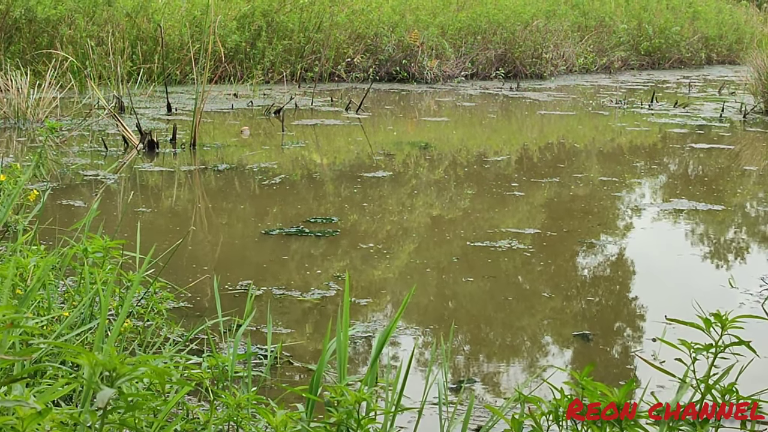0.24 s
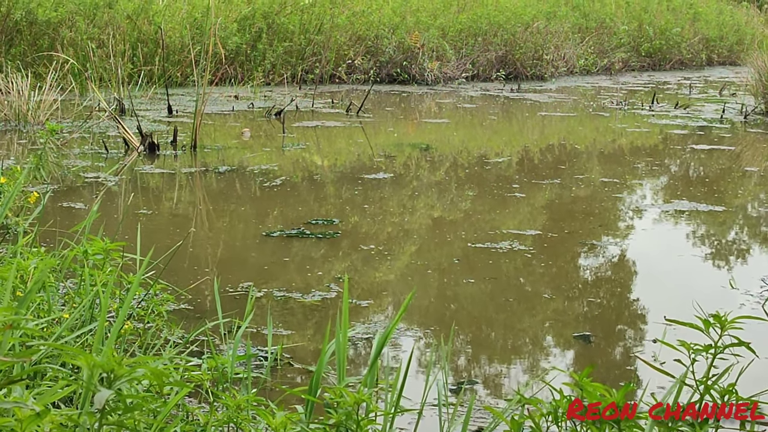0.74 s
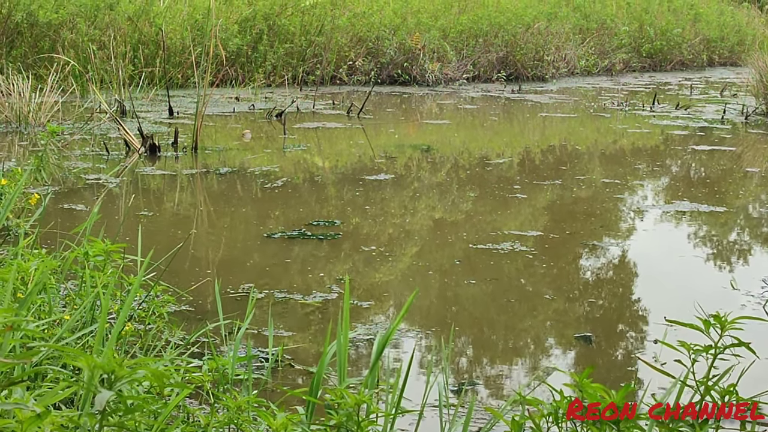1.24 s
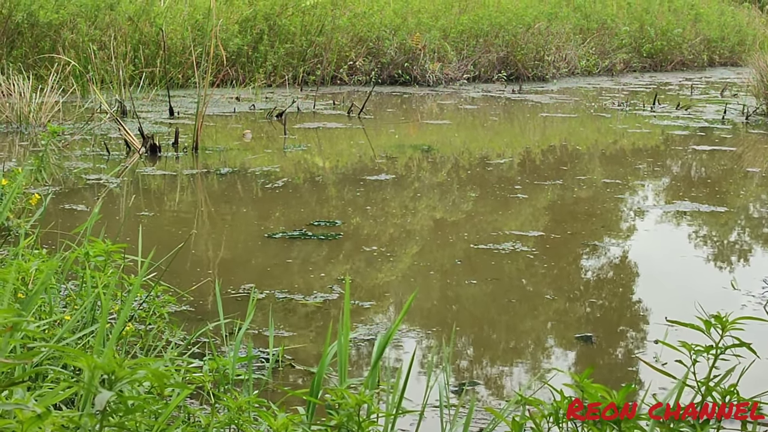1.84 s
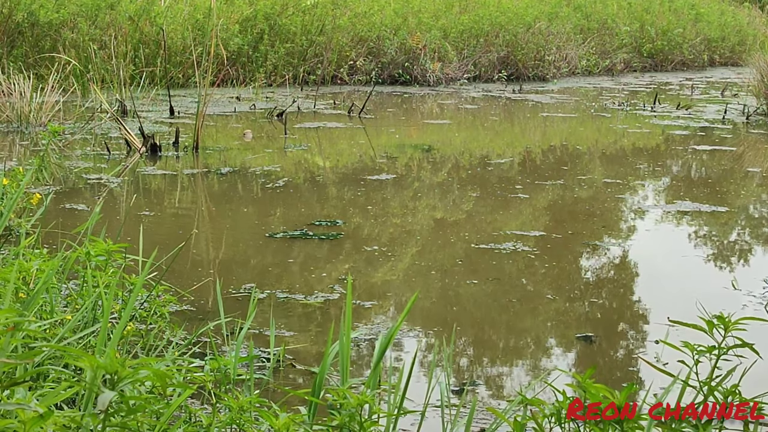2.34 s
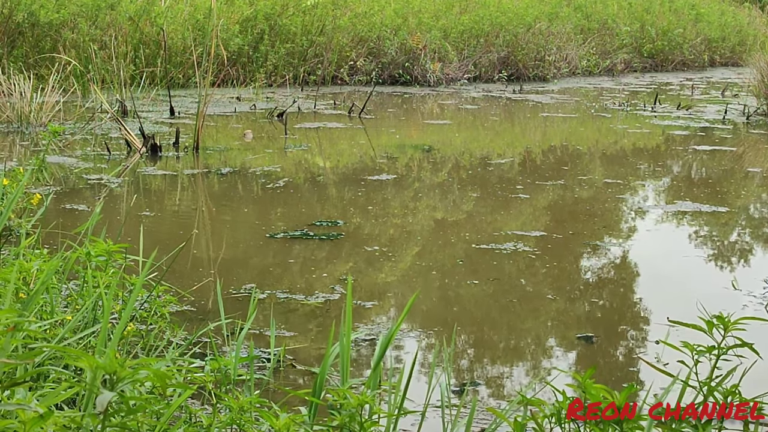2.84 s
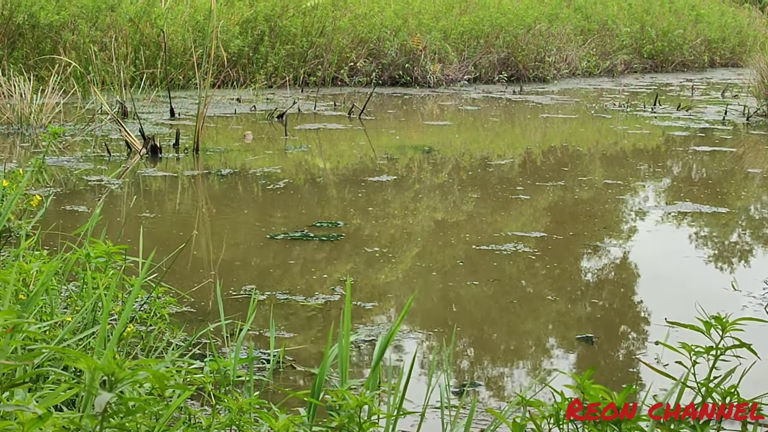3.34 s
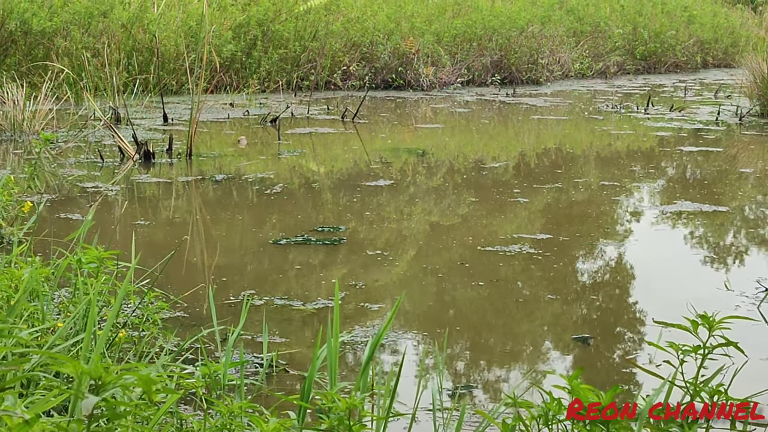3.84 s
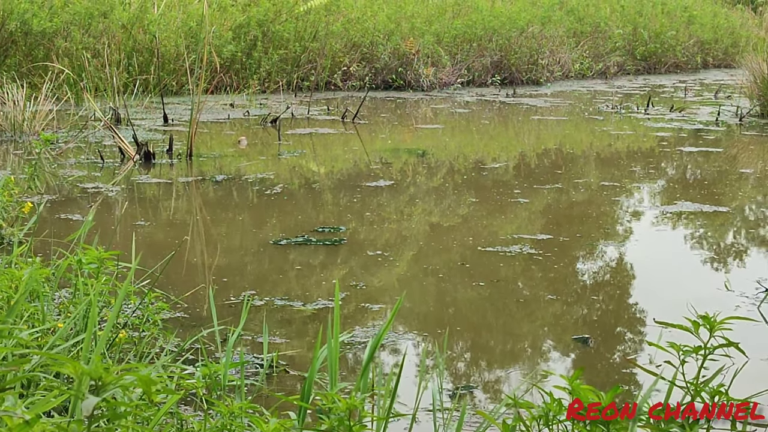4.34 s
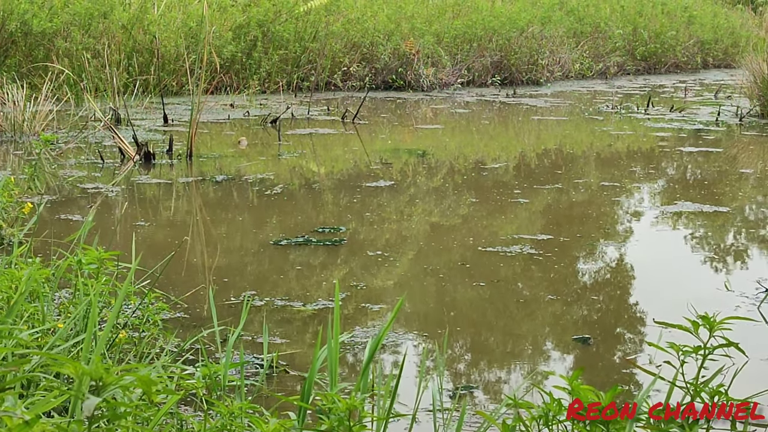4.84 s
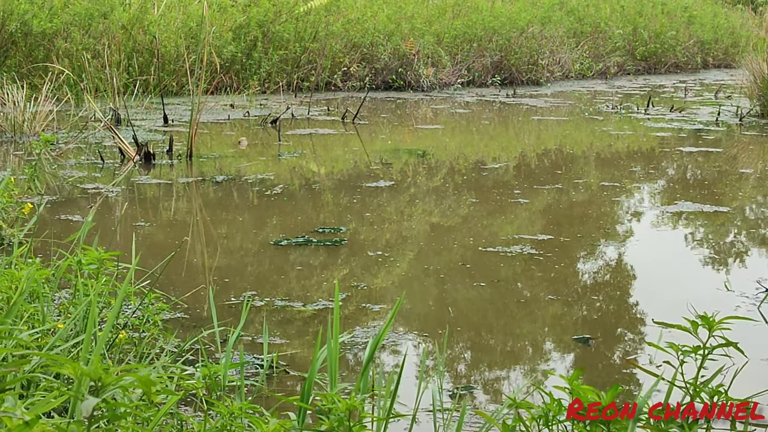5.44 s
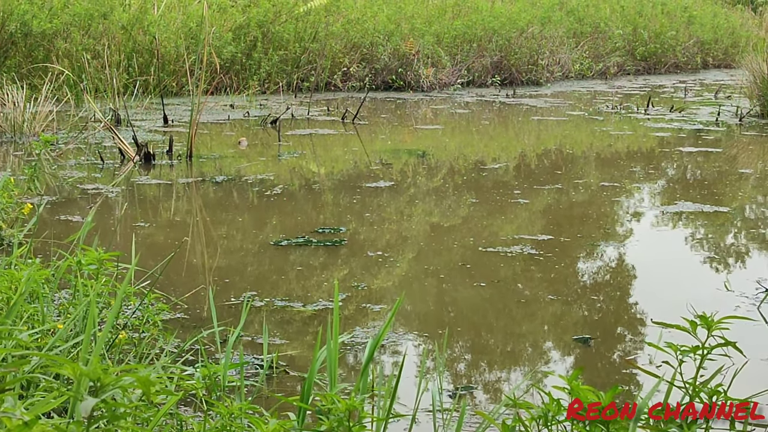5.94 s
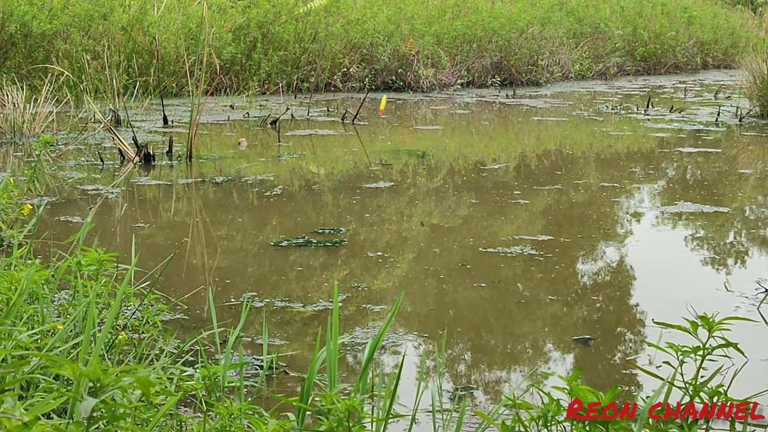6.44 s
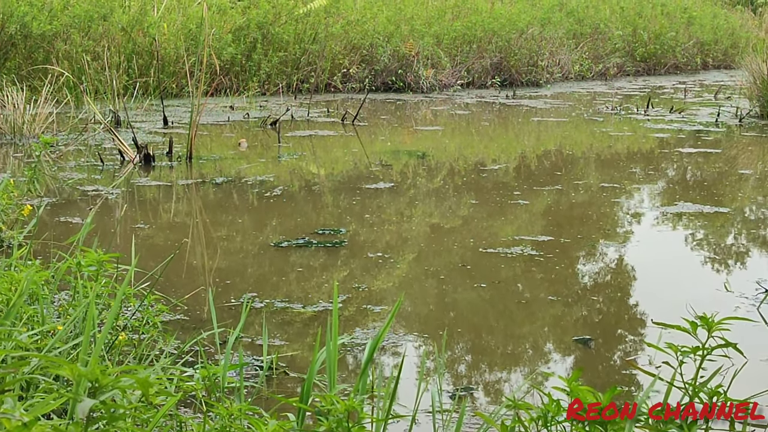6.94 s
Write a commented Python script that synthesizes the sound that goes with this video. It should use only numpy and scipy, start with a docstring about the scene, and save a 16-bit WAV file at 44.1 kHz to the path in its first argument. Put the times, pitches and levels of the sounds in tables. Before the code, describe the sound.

A quiet chorus of high insects chirrs throughout around a pond, over a faint distant rumble. A fast trill runs through the first half, with a few faint, far whistles. A twig snaps sharply close by at about 1.1 seconds, smaller cracks and a grass swish follow around 1.6, and more rustling and ticks come near 3. At 3.6 the sound cuts out for an instant, then returns with a pop, a low thump and a few clicks as the volume climbs back. From about 4 seconds a cricket gives thin, very high chirps, about eight a second. A small bird sings a short sliding phrase five times between 4.4 and 6.9, lightly echoing, with faint hoarse calls behind. A nearby cicada rasps in three rising swells at about 4.2, 4.9 and 5.5, then tightens into a clear, fluttering whine that holds until the end, just past 7.

```python
"""A chorus of insects chirrs and trills around a swampy pond, over distant rumble, faint whistles,
rustling grass and snapping twigs. Midway the sound cuts out and restarts: the signal swings off zero
in steps while the volume creeps back. Then a cricket strokes its wings, a small bird repeats a phrase,
and a near cicada clicks its tymbals (drum-like skins on its body), rasping at first and then
tightening into a clear whine."""
import sys
import numpy as np
from scipy import signal
from scipy.io import wavfile
from scipy.ndimage import uniform_filter1d

SR = 44100
rng = np.random.default_rng(int(sys.argv[2]) if len(sys.argv) > 2 else 0)


def put_to_file(sound):
    """Save the sound as 16-bit audio at rate SR, in the file named by the first command-line argument."""
    columns = np.atleast_2d(sound).T  # one column per channel
    safe = np.clip(columns, -1, 1)
    whole_steps = np.round(safe * 32767)
    wavfile.write(sys.argv[1], SR, whole_steps.astype(np.int16))


N = 316638
T = np.arange(N) / SR
CUT_S, RESTART_S = 3.567, 3.5944  # the sound drops out between these times
TREBLE_LIMIT_HZ = 14280


def gain_of(db):
    """Turns decibels into a number to multiply by."""
    return 10 ** (np.asarray(db) / 20)


def unit_level(x):
    """Scales a signal to an average (rms) size of 1."""
    return x / np.sqrt(np.mean(x ** 2) + 1e-20)


def sine(hz):
    """A pure tone that follows a pitch curve."""
    return np.sin(2 * np.pi * np.cumsum(hz) / SR)


def curve_at(points, hz):
    """Looks up values between a table's frequencies, on a log scale."""
    f, value = np.transpose(points)
    return np.interp(np.log(hz + 1), np.log(f + 1), value)


def add(mix, s, sound):
    """Mixes a sound in at s seconds."""
    part = mix[round(s * SR):][:len(sound)]
    part += sound[:len(part)]


def wander(hz):
    """A random drift that changes up to about hz times a second."""
    return unit_level(signal.sosfilt(signal.butter(2, hz, fs=SR, output="sos"), rng.standard_normal(N)))


def resonate(x, hz, width_hz):
    """Rings at a moving pitch: shifts that pitch down to zero, smooths twice, and shifts back."""
    turn = np.exp(2j * np.pi * np.cumsum(hz) / SR)
    decay = np.exp(-np.pi * width_hz / SR)
    return (turn * signal.lfilter([(1 - decay) ** 2], [1, -2 * decay, decay ** 2], x / turn)).real


def place(x, pan_db, lag):
    """Puts a sound to one side: the left ear gets it pan_db louder and lag samples later."""
    return np.array([np.roll(x, lag) * gain_of(pan_db / 2), x * gain_of(-pan_db / 2)])


def echoes(x, fade_s, level_db):
    """A blur of echoes from the reeds and the far bank, different at each ear."""
    t = np.arange(SR // 3) / SR
    tail = rng.standard_normal((2, len(t))) * gain_of(-60 * t / fade_s) * (t > .005)
    return gain_of(level_db) * signal.oaconvolve(x[None], tail / np.linalg.norm(tail[0]), axes=1)[:, :N]


def clicks(per_s, spread_db):
    """Two unrelated streams of dense clicks of uneven size."""
    size = gain_of(spread_db * np.minimum(rng.exponential(1, (2, N)), 4))
    return size * rng.standard_normal((2, N)) * (rng.random((2, N)) < per_s / SR)


# Tone of the open air before and after the restart: f/Hz, relative level/dB
AIR_BEFORE = [(20, -8.5), (50, 1.5), (75, -8), (110, -8.5), (180, -13.5), (300, -19), (1000, -25),
              (2500, -27.5), (5500, -65), (9000, -26.5), (10800, -33), (14500, -25)]
AIR_AFTER = [(20, -18), (55, 0.5), (80, -21.5), (110, -6), (180, -16), (300, -20.5), (1000, -28.5),
             (2500, -31), (5500, -45), (9000, -31), (10800, -35), (14500, -25.5)]
# How alike the air sounds at the two ears: f/Hz, likeness (1 same, 0 unrelated, -1 opposite)
AIR_LIKENESS = [(60, 0.78), (180, 0.75), (540, 0.36), (1610, -0.24), (4830, 1), (14500, -0.92)]


def air(spectrum, level_db):
    """Open air and distant rumble: noise with drifting louder and softer patches."""
    frames, hz = N // 256 + 5, np.fft.rfftfreq(1024, 1 / SR)
    noise = rng.standard_normal((frames, 513, 5)).T
    left, other = noise[0] + 1j * noise[1], noise[2] + 1j * noise[3]
    patches = unit_level(uniform_filter1d(uniform_filter1d(noise[4], size=10, axis=0), size=8, axis=1))
    alike = curve_at(AIR_LIKENESS, hz)[:, None]
    ears = np.array([left, alike * left + np.sqrt(1 - alike ** 2) * other])
    ears *= gain_of(curve_at(spectrum, hz)[:, None] + 2.06 * patches) * (hz > 0)[:, None]
    return gain_of(level_db) * unit_level(signal.istft(ears, nperseg=1024, noverlap=768)[1][:, :N])


def engine():
    """A deep engine note far away, nearly steady."""
    tone = sine(37.5 * (1 + .051 * wander(9.1)))
    return gain_of(-55 + 2.3 * wander(28)) * tone


# Far insects and low hums: f/Hz, width/Hz, level before/dB, level after the restart/dB,
# throb rate/Hz, throb depth (0-1), left over right/dB, likeness at the two ears (0-1)
CHORUS = [(50.75, 5.1, -76, -66, 15, 0.12, 14.5, 1), (160.6, 28, -76.5, -72.5, 3.6, 0.23, 1, 1),
          (267.5, 23, -80.5, -87.5, 23, 0.25, 3.5, 0.78), (530.7, 97, -76.5, -84, 6.5, 0.25, 1, 0.77),
          (3130, 300, -68.5, -72.5, 55, 0.23, 2.5, 0.17), (4536, 220, -80, -85, 56, 0.19, 2, 0.2),
          (4742, 220, -75, -88, 55, 0.2, -2.5, 0.36), (6614, 460, -69, -68.5, 110, 0, 0.5, 0.05),
          (7115, 664, -64.5, -63.5, 54, 0.1, -3.5, 0.067), (8960, 960, -79, -80.5, 90, 0, 11, 0.95),
          (12160, 720, -76, -90.5, 32, 0.1, -3.5, 0.3), (13280, 1500, -72, -72, 41, 0.1, 6.5, 0.37)]


def chorus():
    """Many tiny clicks ring one body pitch per kind of insect; each band throbs at its own uneven rate."""
    out, drive = np.zeros((2, N)), clicks(per_s=4000, spread_db=2.14)
    for hz, width, before_db, after_db, throb_hz, depth, pan_db, alike in CHORUS:
        body = signal.tf2sos(*signal.iirpeak(hz, hz / width, SR))
        own_clicks = np.roll(drive, rng.integers(N), axis=1)
        left, other = signal.sosfilt(np.tile(body, (2, 1)), own_clicks)
        ears = np.array([left, alike * np.roll(left, 14) + np.sqrt(1 - alike ** 2) * other])
        throb = 1 + depth * sine(throb_hz * (1 + .2 * wander(8)))
        level_db = np.where(T < RESTART_S, before_db, after_db) + 1.26 * wander(7.8)
        out += unit_level(ears * throb) * gain_of(level_db + pan_db / 2 * np.array([[1], [-1]]))
    return out


# Faint far whistles: t/s, length/s, starting f/Hz, ending f/Hz, level/dB
WHISTLES = [(0, .25, 1260, 1300, -82), (1.68, .1, 1700, 2700, -78), (1.79, .1, 2550, 1950, -78),
            (2.01, .11, 1800, 2800, -77), (2.37, .1, 1950, 2800, -79), (2.76, .1, 1950, 2800, -78)]
# Faint hoarse notes, all rising alike: t/s, length/s, level/dB
CROAKS = [(3.812, .18, -75), (4.215, .27, -75), (4.73, .13, -73), (5.199, .1, -73.5), (5.33, .17, -73),
          (5.72, .23, -76), (6.228, .2, -76), (6.67, .22, -76)]


def far_calls():
    """Sliding calls: a whistle blends a pure tone with ringing noise, a croak is all noise."""
    croak_from_hz, croak_to_hz = 3670, 4630
    calls = [(*row, .4) for row in WHISTLES]  # the added number is how hoarse the call is
    calls += [(s, length, croak_from_hz, croak_to_hz, db, 1) for s, length, db in CROAKS]
    out = np.zeros(N)
    for s, length, from_hz, to_hz, db, hoarse in calls:
        hz = np.linspace(from_hz, to_hz, round(length * SR))
        rough = resonate(rng.standard_normal(SR // 2)[:len(hz)], hz, width_hz=600)
        call = (1 - hoarse) * unit_level(sine(hz)) + hoarse * unit_level(rough)
        add(out, s, gain_of(db) * unit_level(call) * signal.windows.tukey(len(hz), .6))
    return place(out, pan_db=-1, lag=2) + echoes(out, fade_s=.25, level_db=-8)


def trill():
    """Even wing strokes, each a short ring, speed up for two seconds and then hold until the cut."""
    strokes_per_s = np.interp(T, [0, 2], [63.5, 69.3]) * (1 + .015 * wander(3.87))
    strokes = abs(sine(strokes_per_s / 2)) ** 4.3  # two humps per wave
    ring = sine(3140 * (1 + .026 * wander(82.5)))
    song = unit_level(ring * strokes) * gain_of(-67 + .8 * wander(12)) * (T < CUT_S)
    return place(song, pan_db=.7, lag=-17) + echoes(song, fade_s=.2, level_db=-7)


# Grass swishes: t/s, base length/s, base level/dB, lowest f/Hz, highest f/Hz
SWISHES = [(1.086, .035, -63, 500, 1980), (1.473, 0.26, -68.5, 705, 4230), (2.866, 0.034, -65, 490, 990),
           (2.959, 0.076, -60, 566, 3240), (2.991, 0.021, -55, 590, 1720), (3.01, 0.02, -53, 630, 2050),
           (3.084, 0.28, -75.5, 4800, 6100), (3.287, .23, -74, 493, 4430)]
# Short pitched ticks: t/s, base level/dB, f/Hz
TICKS = [(2.925, -53.5, 2370), (3.173, -70.5, 925), (5.91, -69, 1520)]
# Twigs snapping close by: t/s, base level/dB, middle f/Hz, left over right/dB
TWIGS = [(1.069, -57.5, 4470, -17), (1.074, -43.5, 2820, -2.5), (1.567, -56.5, 2400, -5),
         (1.572, -55, 1250, 2), (1.583, -62, 5300, 18), (1.591, -56.5, 1450, 0), (1.605, -65, 3540, -25),
         (1.662, -67.5, 880, 2), (1.685, -68, 1060, 5), (1.709, -66.5, 1670, -4), (2.439, -64, 920, 0),
         (2.856, -62, 930, 3), (2.927, -65, 910, 0)]


def rustles():
    """Grass, ticks and twigs are clumps of tiny snaps, quick to rise and slower to settle."""
    bursts = [(*row, 1) for row in SWISHES]  # 1 dB to the left
    tick_spread = 2 ** (.11 / 2)  # a band .11 octaves wide
    bursts += [(s, .0087, db, hz / tick_spread, hz * tick_spread, 0) for s, db, hz in TICKS]
    for s, db, hz, pan_db in TWIGS:
        force_db = db + 72  # louder snaps last longer and cover more pitches
        length, spread = .005 + .0004 * force_db, 2 ** ((.6 + .09 * force_db) / 2)
        bursts.append((s, length, db, hz / spread, min(hz * spread, TREBLE_LIMIT_HZ), pan_db))
    out, grain_samples = np.zeros((2, N)), 32
    for s, length, db, low_hz, high_hz, pan_db in bursts:
        progress = np.linspace(0, 1, round(1.56 * length * SR))
        noise = rng.standard_normal((2, SR))[:, :len(progress)]
        sizes = gain_of(1.53 * rng.standard_normal(SR // grain_samples))
        snaps = noise * np.repeat(sizes, grain_samples)[:len(progress)]
        snaps[0] = .43 * np.roll(snaps[1], 6) + .62 * snaps[0]  # the ears share part of the sound
        band = signal.butter(2, [low_hz, max(high_hz, 1.1 * low_hz)], "band", fs=SR, output="sos")
        shape = np.minimum(progress / .15, 1) * (1 - progress) ** 1.1
        burst = unit_level(signal.sosfilt(band, snaps)) * shape
        for side in range(2):
            add(out[side], s, gain_of(db + 7.5 + pan_db * (.5 - side)) * burst[side])
    return out


# The notes of the bird's phrase: t/s within it, length/s, starting f/Hz, ending f/Hz, relative level/dB
BIRD_NOTES = [(0, .0074, 2920, 1960, -6), (.017, .014, 1900, 3100, -3.5), (.052, .014, 1900, 3100, -4),
              (.092, .016, 3150, 3600, -2), (.108, .026, 3600, 3150, -2), (.126, .033, 3100, 1980, -2)]
# Each time the bird sings it: t/s, level/dB
BIRD_REPEATS = [(4.357, -57), (4.778, -57.5), (5.228, -57), (5.875, -57), (6.682, -58.5)]


def bird():
    """A small bird sings pure sliding notes, the same phrase each time, and the far bank echoes them."""
    out = np.zeros(N)
    for s, phrase_db in BIRD_REPEATS:
        for start, length, from_hz, to_hz, db in BIRD_NOTES:
            hz = np.geomspace(from_hz, to_hz, round(length * SR))
            note = sine(hz) * signal.windows.tukey(len(hz), .5)
            add(out, s + start, gain_of(phrase_db + db) * note)
    return place(out, pan_db=-1.8, lag=20) + echoes(out, fade_s=.55, level_db=1)


# Cricket chirps: t/s, number of wing strokes
CHIRPS = [(3.875, 1), (4.093, 3), (4.245, 2), (4.357, 3), (4.478, 3), (4.620, 3), (4.748, 3), (4.861, 3),
          (4.982, 3), (5.101, 3), (5.229, 3), (5.349, 3), (5.476, 3), (5.603, 4), (5.741, 4), (5.869, 3),
          (6.029, 3), (6.164, 3), (6.293, 4), (6.420, 4), (6.548, 4), (6.669, 4), (6.797, 4), (6.917, 4),
          (7.037, 4), (7.166, 2)]


def cricket():
    """Each wing stroke rings for a few milliseconds; the strokes grow louder through a chirp."""
    t, out = np.arange(round(.0087 * SR)) / SR, np.zeros(N)
    stroke = np.hanning(len(t)) * np.sin(2 * np.pi * (8150 * t - 15000 * t ** 2))  # slides down a little
    for s, count in CHIRPS:
        for k in range(count):
            level_db = -54 - 4.9 * np.exp(-k / 2.8) + .46 * rng.standard_normal()
            add(out, s - .003 + .0082 * k, gain_of(level_db) * stroke)
    return place(out, pan_db=7.5, lag=-16) + echoes(out, fade_s=.2, level_db=-11)


# The rasping cicada lifts its pitch three times: starting t/s, peak t/s, rise in f/Hz
RASP_LIFTS = [(4.108, 4.214, 178), (4.707, 4.899, 370), (5.292, 5.495, 495)]


def cicada_rasp():
    """Uneven tymbal clicks ring the body; as its pitch lifts, the rasp gets louder and brighter."""
    rest_hz, full_lift_hz, fall_s = 3034, 530, .0475
    whine_s, end_s = WHINE_PITCH[0][0], 5.85
    pitch = rest_hz
    for s, peak_s, hz in RASP_LIFTS:
        pitch += hz * np.sin(np.pi / 2 * np.interp(T, [s, peak_s, peak_s + fall_s], [0, 1, 0]))
    pitch = np.where(T < whine_s, pitch, np.interp(T, *np.transpose(WHINE_PITCH)))
    lift = (pitch - rest_hz) / full_lift_hz
    drive = clicks(per_s=1500, spread_db=.78)
    drive[1] = .7 * np.roll(drive[0], 17) + .7 * drive[1]  # the ears share part of the sound
    # How the body rings: multiple of the pitch, width/Hz, relative level/dB, change at full lift/dB
    rings = [(1, 80, 2, -14), (1, 450, 2, 0), (2, 500, -6, 4), (4, 800, -9, 9)]
    body = sum(gain_of(db + lift_db * lift) * unit_level(resonate(drive, multiple * pitch, width))
               for multiple, width, db, lift_db in rings)
    fade_db = np.interp(T, [whine_s, end_s], [0, -8])  # the rasp gives way to the whine
    return body * gain_of(-70 + 5.5 * lift + fade_db) * (T > RESTART_S) * (T < end_s)


# The pitch of the same cicada's whine: t/s, f/Hz
WHINE_PITCH = [(5.55, 3200), (5.62, 3430), (5.71, 3558), (5.87, 3525), (5.91, 3388), (6.1, 3338),
               (6.7, 3256), (6.74, 3272), (7.18, 3212)]
# The tones in the whine: multiple of the pitch, relative level/dB, flutter depth (0-1),
# level drift/dB, left over right/dB
WHINE_TONES = [(1, 2.5, .04, 1.2, -1), (2, 5.5, .4, 3, -3.6), (3, -19, .2, 3, 0), (4, 2.5, .4, 2.5, 2.4)]


def cicada_whine():
    """The clicks lock into a stack of fluttering tones: the upper ones grow as the roughness eases."""
    lock_s, swell_s, growth_db_per_s = .36, .04, .8
    since = np.maximum(T - WHINE_PITCH[0][0], 0)
    loose = np.maximum(1 - since / lock_s, 0)  # falls from 1 to 0 as the clicks lock
    effort_db = -63.5 - 10 * np.exp(-since / swell_s) + growth_db_per_s * since
    upper_db = -24 * loose ** 2
    rough = .25 + .35 * np.sqrt(loose)
    pitch = np.interp(T, *np.transpose(WHINE_PITCH)) * (1 + .02 * rough ** 2 * wander(200))
    turns, flutter = np.cumsum(pitch) / SR, sine(.105 * pitch)
    drifts = [wander(13) for _ in range(3)]
    out = np.zeros((2, N))
    for n, (multiple, db, depth, drift_db, pan_db) in enumerate(WHINE_TONES):
        tone = (1 + depth * flutter) * np.exp(2j * np.pi * multiple * turns)
        for side in range(2):  # echoes make each tone fade and slip differently at each ear
            swell, slip = drifts[(n + side) % 3], drifts[(n + side + 1) % 3]
            level_db = effort_db + db + upper_db * (n > 0) + drift_db * swell + pan_db * (.5 - side)
            out[side] += gain_of(level_db) * (tone * np.exp(.55j * np.sqrt(multiple) * slip)).real
    return np.array([np.roll(out[0], -14), out[1]]) * (since > 0)  # the left ear hears it first


def scene():
    """Everything around the pond, mixed together."""
    open_air = np.where(T < RESTART_S, air(AIR_BEFORE, level_db=-61), air(AIR_AFTER, level_db=-61))
    background = open_air + engine()
    insects = chorus() + trill() + cicada_rasp() + cicada_whine() + cricket()
    return background + insects + bird() + far_calls() + rustles()


# Sudden jumps as the volume climbs back after the restart: t/s, change in level/dB
VOLUME_JUMPS = [(3.6032, 2.0), (3.6476, -5.4), (3.7115, -2.95), (3.7727, -2.3), (3.8325, -1.0)]


def record(dry):
    """The sound drops out briefly and returns in steps, pushed off zero; the highest treble is cut."""
    muted_db, restart_gain, climb_per_s = -45, .135, 6.5
    gain = np.where(T < RESTART_S, gain_of(muted_db), restart_gain)
    for s, jump_db in VOLUME_JUMPS:
        jumped = gain[round(s * SR)] * gain_of(jump_db)
        gain = np.where(T < s, gain, np.minimum(jumped + climb_per_s * (T - s), 1))
    since = np.maximum(T - RESTART_S, 0)
    drain_s, recover_s = .354, 1.15  # the push drains away, dips past zero and creeps back
    push = .0975 * np.exp(-(since / drain_s) ** 2) - .0089 * np.exp(-since / recover_s)
    offset = push * (T >= RESTART_S) * np.array([[.68], [1]])  # weaker on the left
    heard = np.where(T < CUT_S, 1, gain) * (dry + offset)
    treble_cut = signal.firwin(1023, TREBLE_LIMIT_HZ, window=("kaiser", 9), fs=SR)
    return signal.oaconvolve(heard, treble_cut[None], "same", axes=1)


dry = scene()
out = record(dry)
put_to_file(out)
```